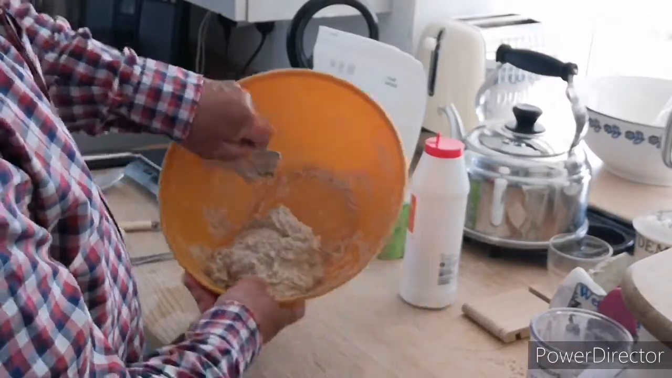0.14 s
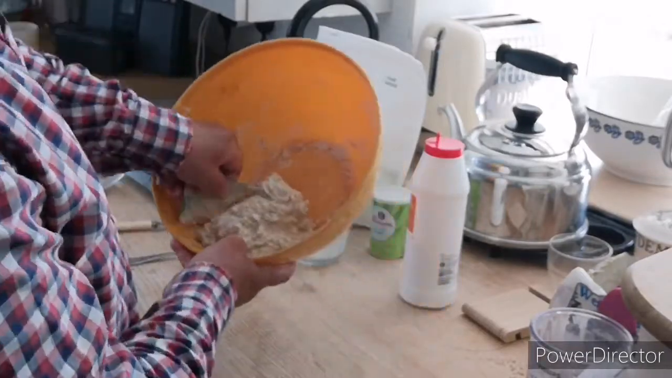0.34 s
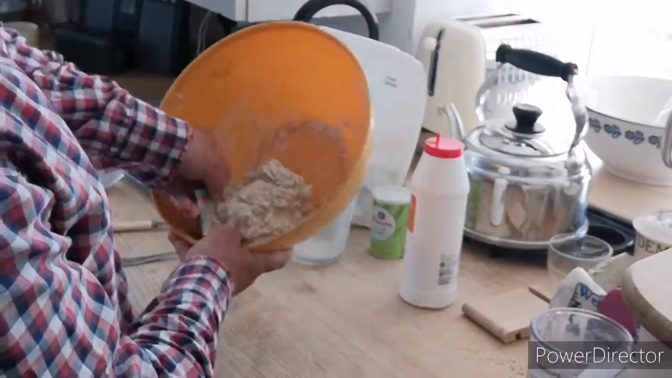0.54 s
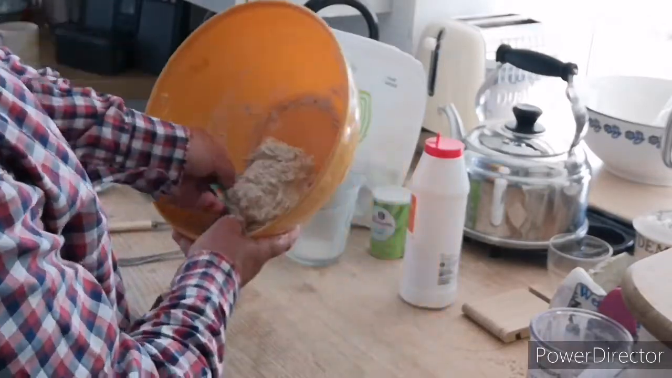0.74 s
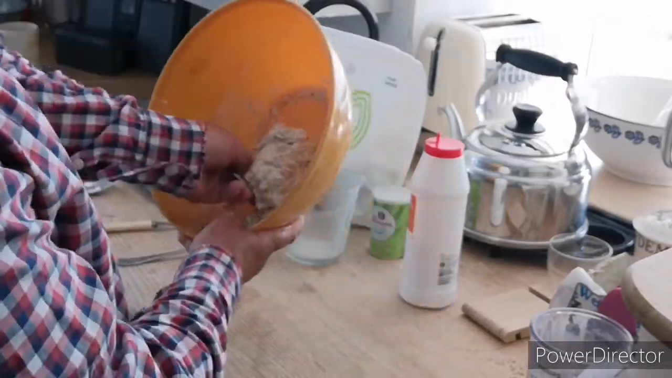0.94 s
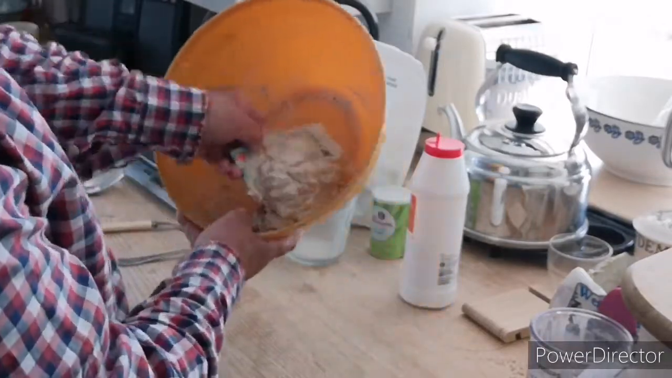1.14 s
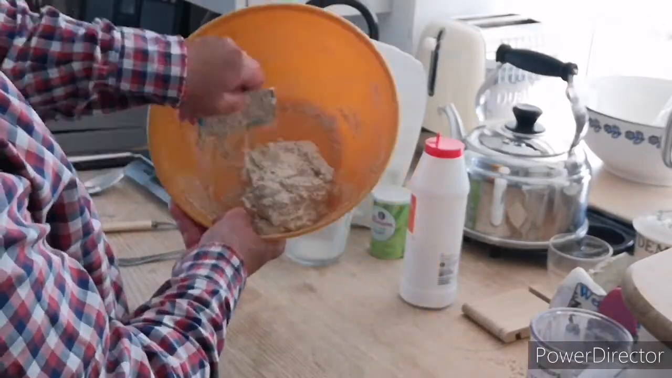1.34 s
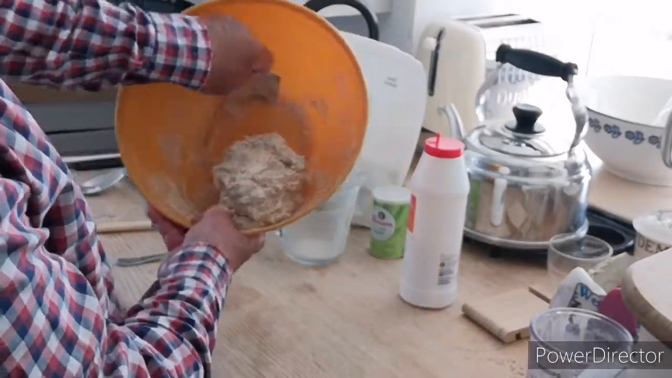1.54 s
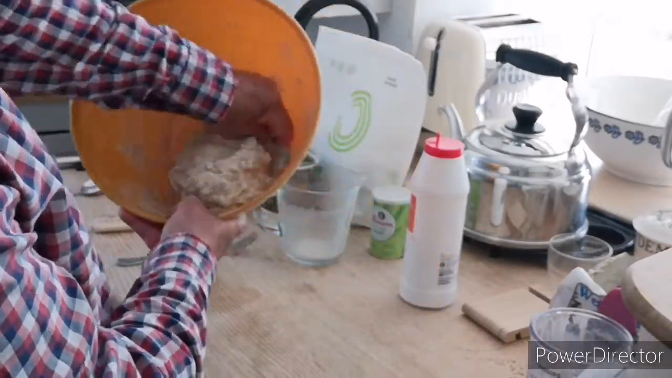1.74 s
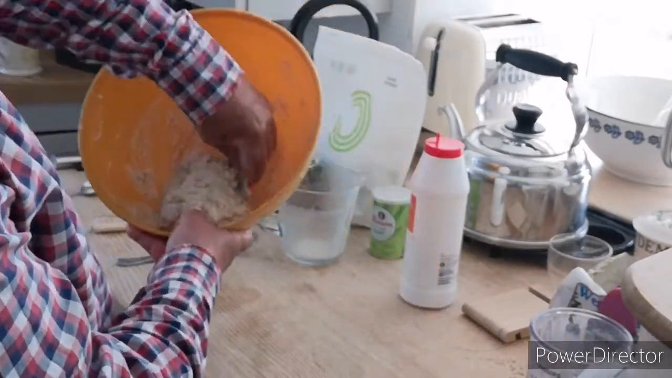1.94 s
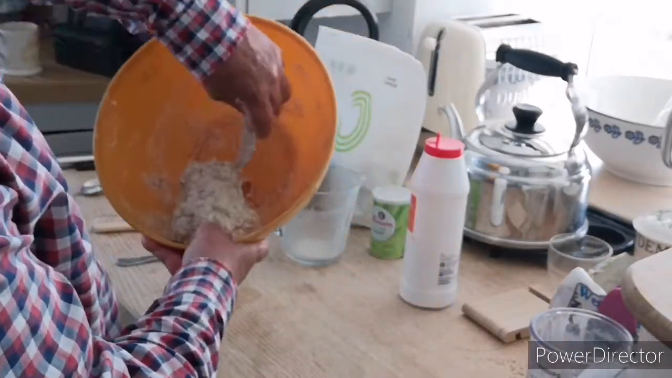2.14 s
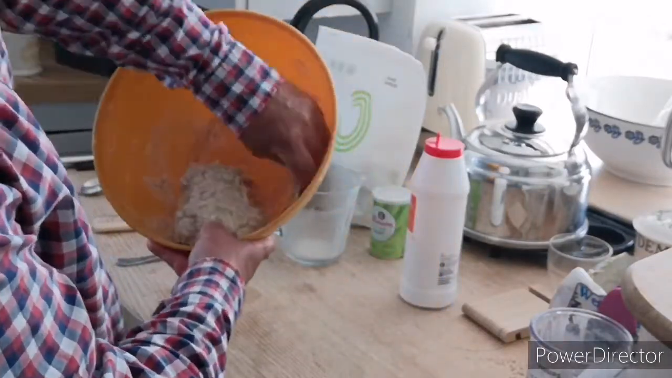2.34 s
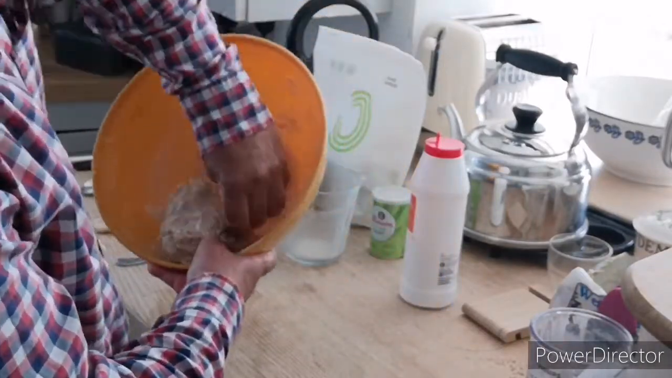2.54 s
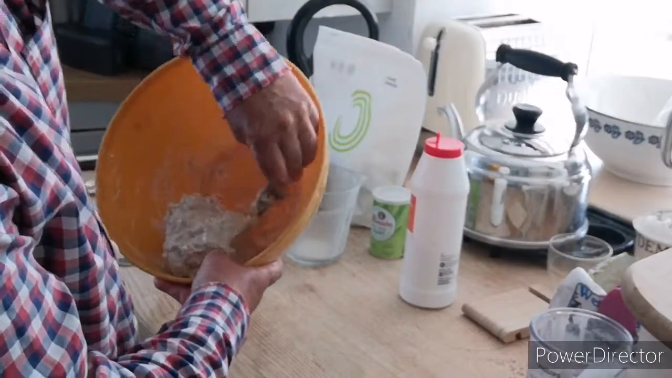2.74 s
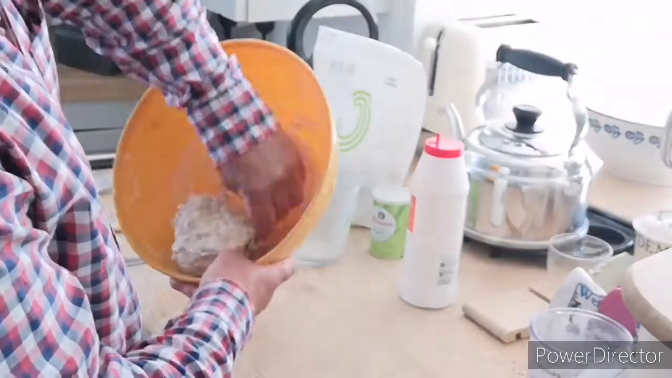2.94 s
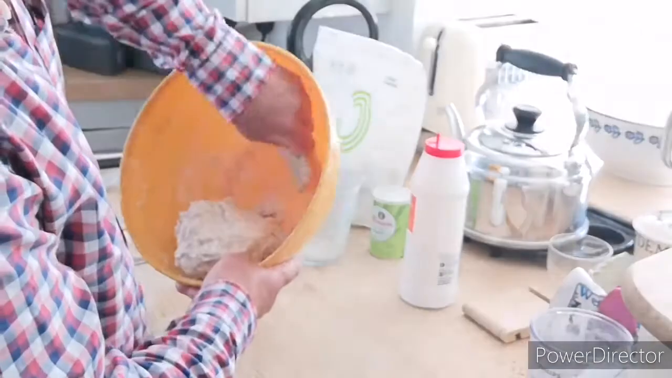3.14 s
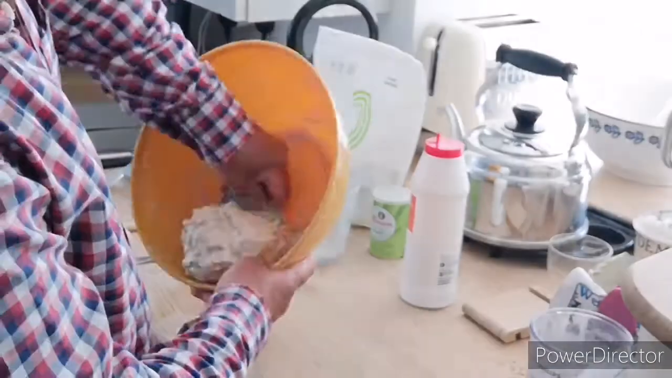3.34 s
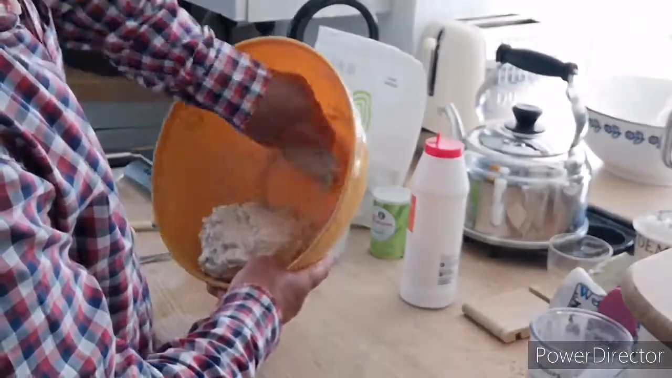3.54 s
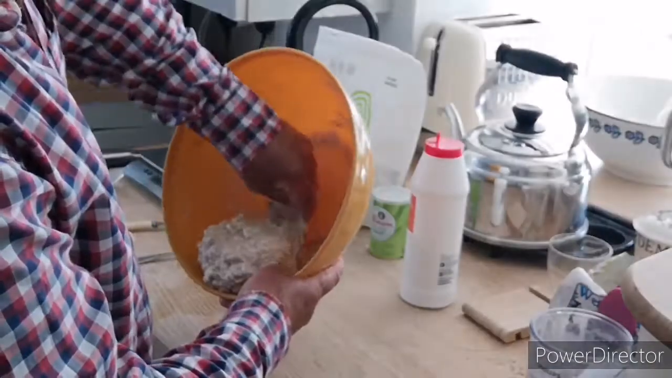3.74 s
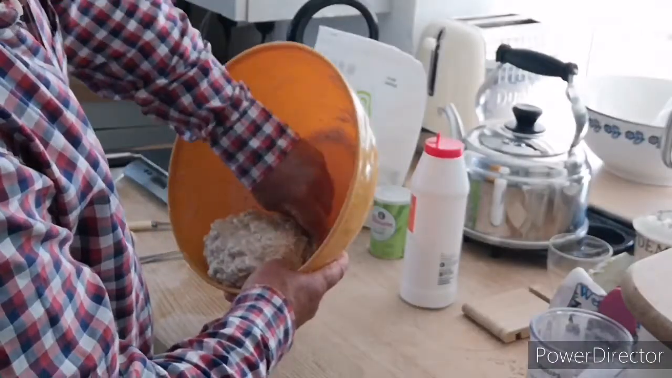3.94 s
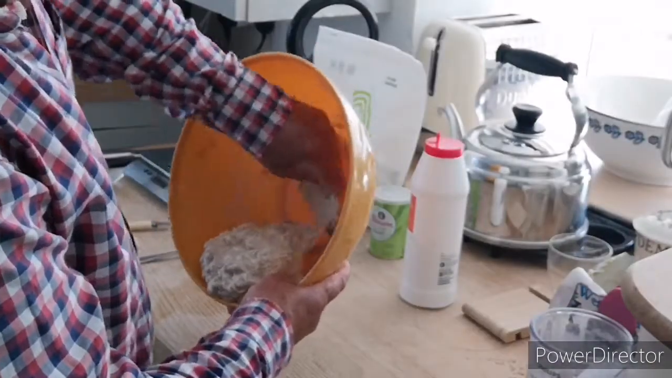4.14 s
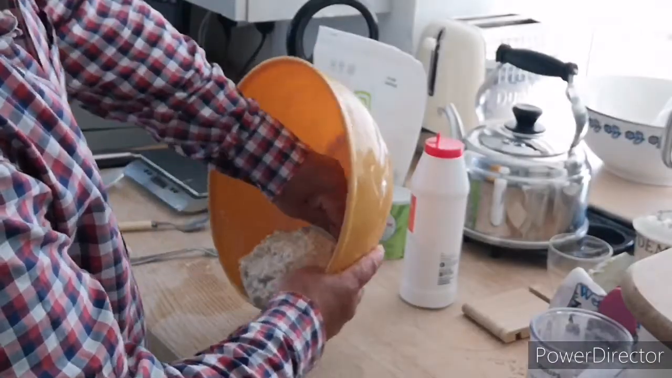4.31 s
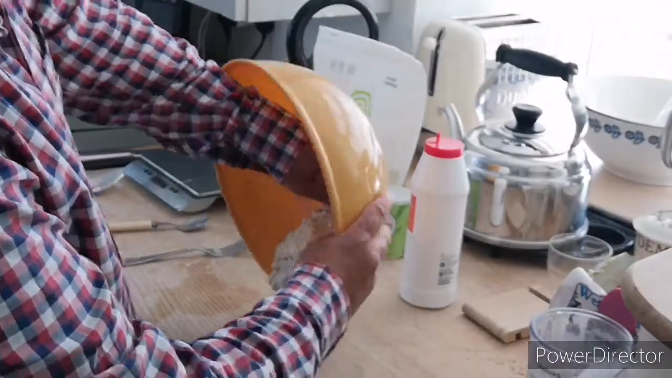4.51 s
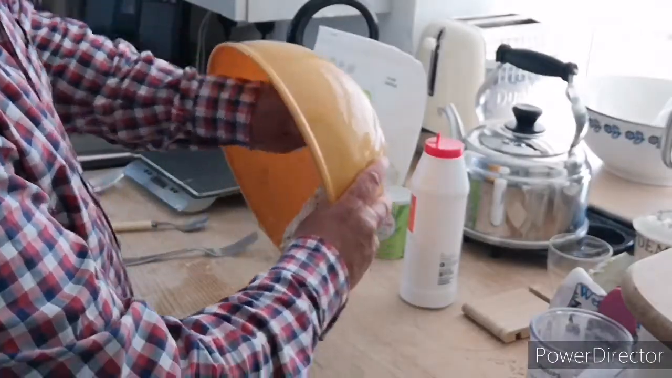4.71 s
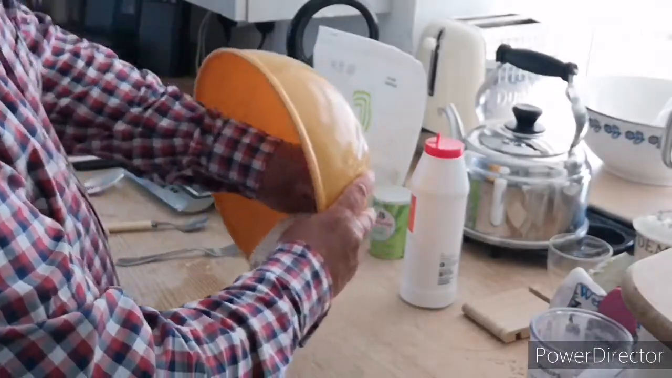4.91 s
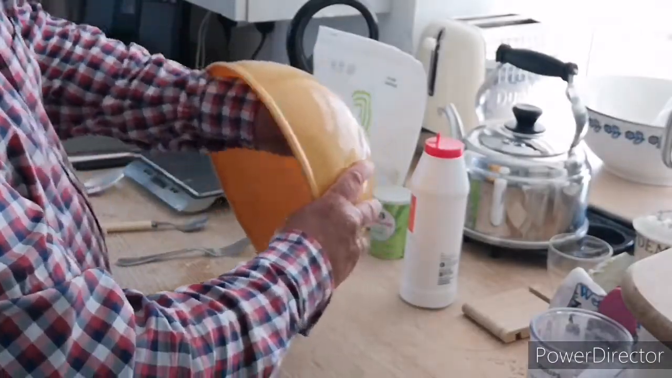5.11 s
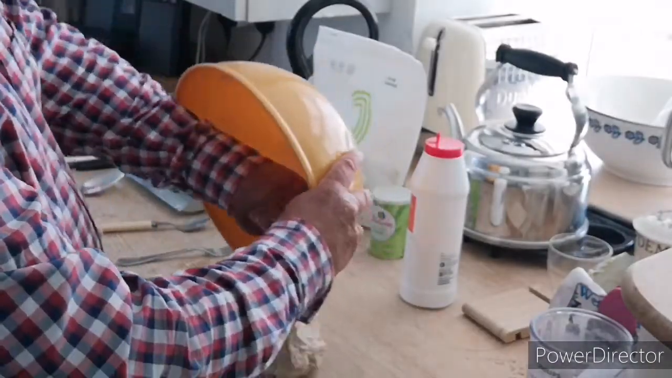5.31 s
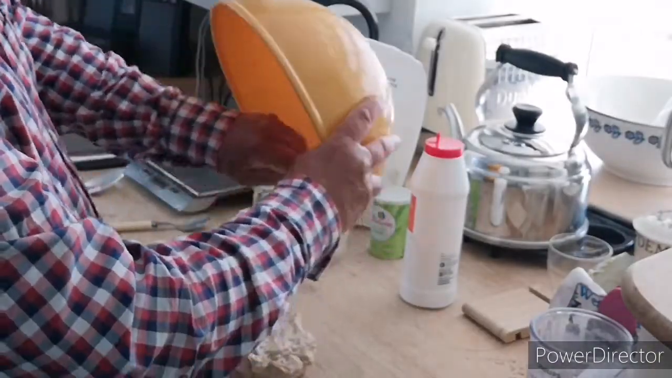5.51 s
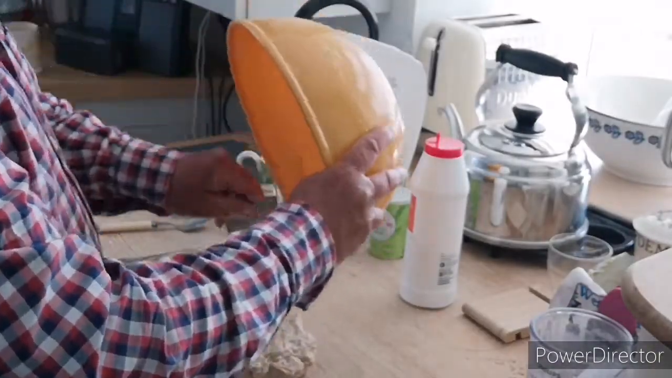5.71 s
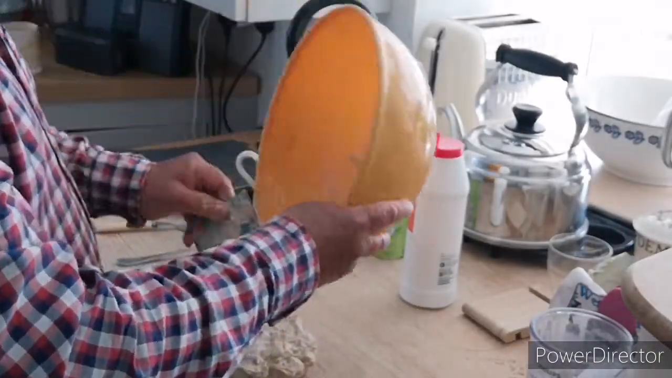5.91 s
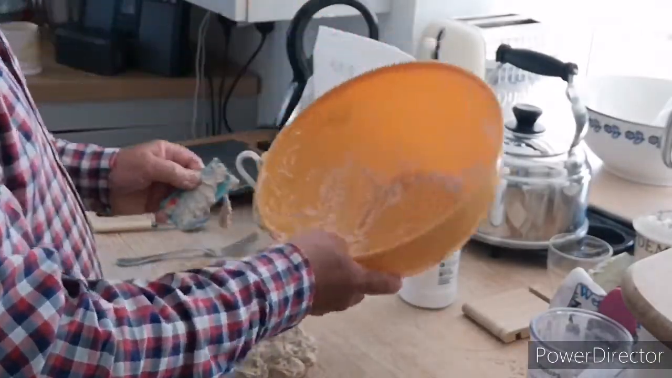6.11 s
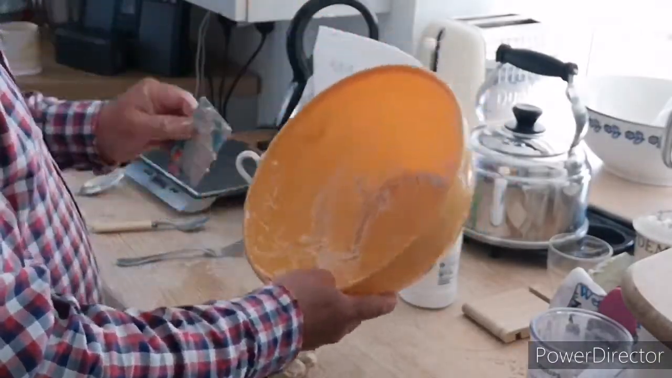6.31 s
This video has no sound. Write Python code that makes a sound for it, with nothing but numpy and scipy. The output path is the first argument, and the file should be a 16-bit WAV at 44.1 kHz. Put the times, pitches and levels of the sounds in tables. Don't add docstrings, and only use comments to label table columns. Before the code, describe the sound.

Close, dry-edged scraping in a small kitchen: each stroke lands with a plastic knock, swells into a grainy rasp and stops abruptly as the blade lifts. The bowl rings mid-high, sometimes hollow, sometimes tight and bright. Strokes are sparse at first and cluster later, finishing with hard knocks and a soft tap. Soft fridge murmur, room air and low thuds lie underneath.

```python
import sys
import numpy as np
from scipy import signal
from scipy.fft import rfft, irfft, next_fast_len
from scipy.io import wavfile
from scipy.ndimage import uniform_filter1d, map_coordinates

SR = 44100
rng = np.random.default_rng(int(sys.argv[2]) if len(sys.argv) > 2 else 0)


def boost_factor(decibels):
    exponent = np.asarray(decibels, float) / 20
    return 10 ** exponent


def wrap_up_sound(samples):
    columns = np.atleast_2d(samples).T
    tamed = np.clip(columns, -1, 1)
    steps = np.round(tamed * 32767).astype(np.int16)
    wavfile.write(sys.argv[1], SR, steps)


N = 284797
T = np.arange(N) / SR

# (time [s], level [dB])
RUMBLE_LEVEL = [(0.0, -55), (0.03, -68), (0.47, -51.5), (0.61, -61), (2.32, -58), (2.39, -71),
                (2.45, -54.5), (3.22, -55.5), (3.79, -47.5), (3.9, -66), (4.06, -51.5), (4.59, -55.5),
                (4.89, -53.5), (5.05, -41.5), (6.08, -63.5), (6.46, -53)]
# (frequency [Hz], density [dB per Hz])
RUMBLE_TONE = [(14, -60), (24, -5.5), (36, -11.5), (43, -2), (49, -8), (55, -13), (66, -16.5), (150, -40.5),
               (320, -29.5), (480, -58.5), (900, -120)]
# (frequency [Hz], width [Hz], level [dB])
HUM_MODES = [(138, 10.1, -2), (164, 9.8, -9)]
# (frequency [Hz], density [dB per Hz])
MURMUR_TONE = [(40, -42), (60, -13), (82, -3.5), (105, -10), (190, -13.5), (260, -50)]
# (time [s], level [dB])
WHINE_LEVEL = [(0, -92), (1.9, -102), (2.0, -74), (2.2, -96), (5.7, -87), (6.46, -97.5)]
# (time [s], level [dB])
THUDS = [
    (.47, -51),
    (1.86, -43.5),
    (2.45, -59),
    (2.59, -50),
    (3.03, -48.5),
    (5.05, -56),
    (5.4, -50),
    (5.65, -57),
]
# (frequency [Hz], density [dB per Hz])
AIR_TONE = [(110, -19.5), (180, -9.5), (287, -2.5), (409, -13), (432, -12.5), (502, -15.5), (676, -23.5),
            (1100, -20), (1270, -26), (1780, -25), (1920, -23), (2190, -24.5), (2950, -29.5), (4790, -33.5),
            (15500, -50.5)]
# (frequency [Hz], likeness [0-1])
ALIKE = [(50, 1), (100, 0.97), (140, 1), (290, 0.57), (600, 0.022), (15000, 0.028)]

# (time [s], hold [s], wall ring [dB], blade hiss [dB re wall], favoured wall pitch [Hz])
DRAGS = [(0.0, 0.059, -51, -12, 2100), (0.1, 0.047, -64, -23, 1500), (0.299, 0.081, -45, -13.5, 2240),
         (0.377, .02, -36.5, -26, 1920), (0.547, 0.042, -58.5, -12, 1950), (0.65, .1, -74, -14, 1600),
         (0.821, 0.004, -45.5, -27, 2030), (1.65, 0.012, -33.5, -17.5, 2000), (1.9, 0.11, -65, -5.5, 1900),
         (2.403, 0.069, -43, -19, 1974), (2.967, 0.023, -36, -14, 1970), (3.21, .09, -56, -25.5, 1930),
         (3.522, 0.09, -69.5, -6, 2000), (3.98, .012, -57, -18, 1680), (3.993, 0.016, -46.5, -14.5, 1680),
         (4.45, 0.05, -67.5, -18, 1810), (4.865, 0.045, -47, -14, 2220), (5.185, 0.086, -61.5, -25, 1830),
         (5.333, 0.017, -40.5, -13.5, 2210), (5.562, 0.028, -37.5, -28, 1690),
         (5.957, 0.043, -56, -32, 2060)]
# (time [s], time to full speed [s], wall ring [dB], blade hiss [dB re wall], favoured wall pitch [Hz])
SWEEPS = [(0.36, 0.062, -41, -12.5, 2170), (1.68, 0.075, -39.5, -9, 1950), (1.72, 0.085, -42.5, -5, 1950),
          (2.44, 0.11, -51, -8.5, 2230), (2.99, .04, -51.5, -13.5, 1950), (3.215, 0.061, -47, -31, 1900),
          (3.255, 0.076, -47, 2, 2300), (3.32, 0.061, -40.5, -11, 1950), (3.652, 0.057, -46.5, -2.5, 1760),
          (3.69, 0.048, -40.5, -5, 2400), (3.995, 0.06, -44.5, -2.5, 1890), (4.282, 0.027, -50, -4.5, 2460),
          (4.3, 0.043, -41.5, -10.5, 2360), (4.885, 0.047, -35, -16, 2280), (5.266, 0.029, -41, -16, 2240),
          (5.33, 0.04, -45.5, -19, 2360), (5.58, 0.03, -46.5, -19, 2030)]
# (time [s], hollow [dB re wall], hollow pitch [Hz], free rim [dB re wall], left-right lean [dB])
POSE = [(0, 0.5, 605, -15, 0.5), (.2, -12.5, 1150, -12, 1), (.29, -46, 1070, -17.5, -1.5),
        (.45, -17.5, 1140, -16.5, -1), (.7, 0, 824, -20, -1.5), (.83, -5, 523, -9.5, 0),
        (1.75, -9.5, 817, -34, -.6), (1.95, -1, 800, -12, 1.5), (2.4, -23.5, 1150, -35, -2),
        (2.97, -9.5, 860, -32, -1), (3.25, -5, 600, -28, -.5), (3.75, -18, 650, -25, -.5),
        (4.03, 0, 524, -36, -.5), (4.36, -17, 636, -15, -.5), (4.5, 2.5, 680, -19, -1),
        (4.88, -31, 1240, -27, -0.5), (5.5, -15, 1170, -29, -0.5), (5.96, -6, 530, -32, -1)]
# (frequency [Hz], width [Hz], level [dB])
WALL = [(1234, 105, -10), (1662, 250, -1), (1902, 178, 4), (2130, 300, 0.5), (2563, 130, 0.5),
        (2690, 110, 1), (2976, 350, -6)]
# (frequency [Hz], width [Hz], level [dB])
HOLLOW = [(397, 200, -18), (495, 100, -5.5), (567, 47, -1.5), (745, 88, -5.5), (840, 135, -6),
          (972, 150, -1), (1280, 260, -3)]
# (frequency [Hz], width [Hz], level [dB])
UPPER = [(3160, 590, -5), (3784, 490, -0.5), (4150, 370, -1.5), (4790, 530, -1.5), (5140, 585, -1.5),
         (5755, 720, -2.5), (6226, 920, -10)]
# (frequency [Hz], width [Hz], level [dB])
RIM = [(2880, 270, -8.5), (4560, 94, 6), (5200, 1050, -4)]
WALL_PLACES_HZ = [1500, 1950, 2400, 3050]
HOLLOW_PLACES_HZ = [530, 800, 1150]
# (frequency [Hz], density [dB per Hz])
BLADE = [(3240, -1), (5500, -37.5), (6430, 0.5), (7680, 0), (8860, -3), (12000, -18), (14400, -29),
         (15500, -38)]
# (frequency [Hz], density [dB per Hz])
EDGE = [(7000, -60), (9500, -6), (12000, -3.5), (14400, 0.5), (15500, -34)]

# (time [s], peak [dB], hollow [dB re peak], crack [dB re peak], struck wall pitch [Hz])
KNOCKS = [(0.3009, -36.5, -12, -3, 1740), (0.3564, -23, -26, -22, 2300), (0.378, -26.5, -31, -18, 1990),
          (0.82, -30.5, -29, -7, 2880), (1.6496, -15.5, 3, 5, 2140), (1.6724, -31, -17, -15, 2700),
          (2.4053, -36, -23, -38, 1990), (2.9677, -20.5, -6, -33, 1940), (3.2092, -43, 5, -8, 1620),
          (3.5244, -51.5, -43, 3, 1900), (3.9937, -31, -15, -15, 1630), (4.129, -33, -10, -15, 1650),
          (4.2947, -37, -21, -18, 2940), (4.863, -37.5, -28, -20, 1690), (4.9038, -20, -57, -13.5, 2130),
          (4.9353, -20.5, -43, -22, 1840), (5.2735, -32, -31, -25, 1770), (5.2947, -25, -37, -18, 1790),
          (5.3349, -20, -42, -21, 1940), (5.565, -18.5, -30, -33, 1715), (5.9599, -40, -19.5, -29, 2240)]
# (time [s], peak [dB], centre [Hz], fizz t60 [s])
TICKS = [
    (1.2491, -54, 11400, 0.23),
    (1.3927, -59, 8120, 0.08),
    (2.2657, -57, 8070, 0.089),
    (2.702, -50.5, 9600, 0.28),
    (2.8784, -58, 7660, 0.08),
    (3.1492, -50.5, 8200, 0.19),
    (3.526, -44, 6660, 0.078),
    (3.92, -43.5, 8950, 0.1),
    (4.58, -51.5, 8800, 0.17),
    (5.1168, -51, 6800, 0.08),
]
# (time [s], length [s], pitch [Hz], level [dB])
SQUEAKS = [
    (2.897, 0.066, 5900, -77),
    (4.184, 0.097, 5660, -67.5),
]
# (frequency [Hz], t60 [s])
KITCHEN = [(300, 0.39), (2000, 0.29), (6000, 0.27), (14000, 0.19)]

HUM_DB, THUD_S, AIR_DB = -58, 0.036, -64.5
SWEEP_RISE_DB, SWEEP_ROUND_S = 19.5, 0.039
DRAG_SAG_DB_PER_S, DRAG_ROUND_S = 37, 0.0037
LIFT_DB_PER_S, BLADE_LIFT_DB_PER_S = 292, 67
TRAIL_DB, TRAIL_DB_PER_S, HOLLOW_TRAIL_DB = -30.5, 107, 2
UPPER_DB, UPPER_FOLLOWS = -0.5, 0.65
EDGE_DB, EDGE_FOLLOWS = -12.5, 1.54
SQUEAK_RISE_S, SQUEAK_SAG_DB_PER_S = 0.011, 124
TOP_HZ = 15500


def unit(x):
    return x / np.sqrt(np.mean(x ** 2) + 1e-20)


def along(points, hz):
    f, v = np.transpose(points)
    return np.interp(np.log(hz + 1), np.log(f + 1), v)


def curves(rows):
    s, *cols = np.transpose(rows)
    return [np.interp(T, s, c) for c in cols]


def wobble(rate):
    knots = rng.standard_normal(int(N * rate / SR) + 4)
    return map_coordinates(knots, [T * rate])


def filtered(x, response):
    m = next_fast_len(N + SR // 2)
    return irfft(rfft(x, m) * response(np.fft.rfftfreq(m, 1 / SR)), m)[..., :N]


def modes(peaks):
    def response(f):
        total = 0
        for k, (centre, width, db) in enumerate(peaks):
            damping = 1j * f * width
            total = total + (-1) ** k * boost_factor(db) * damping / (centre * centre - f * f + damping)
        return total
    return response


def colour(spectrum):
    return lambda f: boost_factor(along(spectrum, f))


def patchy(x, depth_db, bins, frames):
    z = signal.stft(x, nperseg=512)[2]
    field = uniform_filter1d(rng.standard_normal(z.shape[1:]), size=bins, axis=0)
    field = uniform_filter1d(field, size=frames, axis=1)
    return unit(signal.istft(z * boost_factor(depth_db * unit(field)), nperseg=512)[1][:, :N])


def stereo_noise(response, patchy_db):
    pair = patchy(rng.standard_normal((2, N)), patchy_db, bins=6, frames=14)

    def mid_side(hz):
        turn = np.arccos(np.clip(along(ALIKE, hz), -1, 1)) / 2
        return response(hz) * [np.cos(turn), np.sin(turn)]
    mid, side = filtered(pair, mid_side)
    return np.array([mid + side, mid - side]) / np.sqrt(np.mean(mid ** 2))


def background():
    swell = boost_factor(HUM_DB) + sum(boost_factor(db) * np.exp(-((T - s) / THUD_S) ** 2) for s, db in THUDS)
    rumble = boost_factor(curves(RUMBLE_LEVEL)[0] + 2.0) * stereo_noise(colour(RUMBLE_TONE), patchy_db=1.5)
    hum = swell * stereo_noise(lambda f: modes(HUM_MODES)(f) ** 2, patchy_db=1.5)
    murmur = boost_factor(-63) * stereo_noise(colour(MURMUR_TONE), patchy_db=-3.9)
    fan = lambda f: modes([(4750, 300, 0)])(f) ** 2
    whine = boost_factor(curves(WHINE_LEVEL)[0]) * stereo_noise(fan, patchy_db=2)
    air = boost_factor(AIR_DB) * stereo_noise(colour(AIR_TONE), patchy_db=0.16)
    return rumble + hum + murmur + whine + air


def strokes():
    wall, upper, blade, pitch, trail, edge = np.full((6, N), 1e-9)
    for rows, round_s, sweeps in ((DRAGS, DRAG_ROUND_S, False), (SWEEPS, SWEEP_ROUND_S, True)):
        for s, length, db, hiss_db, hz in rows:
            at = slice(round(s * SR), round(s * SR) + SR // 2)
            t = T[at] - s
            if sweeps:
                early_db = -SWEEP_RISE_DB * np.clip(1 - t / length, 0, 1) ** 2
            else:
                early_db = -DRAG_SAG_DB_PER_S * np.minimum(t, length)
            late = np.hypot(np.clip(t - length, 0, 1), round_s) - round_s
            touch = np.clip(t * 700, 0, 1)
            power = touch ** 2 * boost_factor(db + early_db - LIFT_DB_PER_S * late) ** 2
            trail[at] += (t > length) * boost_factor(db + TRAIL_DB - TRAIL_DB_PER_S * late) ** 2
            hiss_db = hiss_db - BLADE_LIFT_DB_PER_S * late
            wall[at] += power
            upper[at] += power * boost_factor(UPPER_DB + UPPER_FOLLOWS * hiss_db) ** 2
            blade[at] += power * boost_factor(hiss_db) ** 2
            edge[at] += power * boost_factor(EDGE_DB + EDGE_FOLLOWS * hiss_db) ** 2
            pitch[at] += power * hz
    live = wall > 1e-9
    return *(live * np.sqrt([trail, wall, upper, blade, edge])), pitch / wall


def slips(rate, spread_db, clump_db, shared):
    when, size, sign = rng.random((3, 3, N))
    grains = (when < rate / SR) * boost_factor(-spread_db * np.log(size + 1e-4)) * np.sign(sign - .5)
    common, own = grains[0], grains[1:]
    mixed = np.sqrt(shared) * common + np.sqrt(1 - shared) * own
    return unit(mixed * boost_factor(clump_db * wobble(60)))


def rung_at(grains, body, places, place_hz, focus):
    out, nearest = 0, np.interp(place_hz, places, np.arange(len(places)))
    for k, hz in enumerate(places):
        favoured = lambda f: modes(body)(f) * modes([(hz, focus * hz, 0)])(f)
        share = np.sqrt(np.clip(1 - abs(nearest - k), 0, 1))
        out = out + share * unit(filtered(grains, favoured))
    return out


def scraping():
    trail, wall, upper, blade, edge, wall_hz = strokes()
    hollow_db, hollow_hz, rim_db, _ = curves(POSE)
    grains = slips(rate=7000, spread_db=2.5, clump_db=1.0, shared=0.14)
    fine = slips(rate=20000, spread_db=0.0, clump_db=1.0, shared=0.25)
    fine = patchy(fine, 2.65, bins=4, frames=6)
    grains = patchy(grains, 3.93, bins=2, frames=10)
    wall_ring = rung_at(grains, WALL, WALL_PLACES_HZ, wall_hz, focus=0.4)
    hollow_ring = rung_at(grains, HOLLOW, HOLLOW_PLACES_HZ, hollow_hz, focus=0.33)
    sound = (wall + trail) * wall_ring
    sound += (wall + trail * boost_factor(HOLLOW_TRAIL_DB)) * boost_factor(hollow_db - 0.5) * hollow_ring
    sound += (upper + trail * boost_factor(-7)) * boost_factor(2.0) * unit(filtered(grains, modes(UPPER)))
    sound += wall * boost_factor(rim_db) * unit(filtered(grains, modes(RIM)))
    sound += edge * unit(filtered(fine, colour(EDGE)))
    sound += (blade + trail * boost_factor(-16.5)) * boost_factor(3.5) * unit(filtered(fine, colour(BLADE)))
    return sound


def knocks():
    (wall, hollow, crack), t = np.zeros((3, 2, N)), np.arange(1500) / SR
    for s, db, hollow_db, crack_db, hz in KNOCKS:
        rattle = 0.12 * rng.standard_normal((2, len(t))) * boost_factor(-60 * t / 0.019)
        rattle[:, 0] = 1
        spot = np.sin(2 * np.pi * hz * t) + 0.14 * np.sin(2 * np.pi * 1.363 * hz * t)
        ring = (1 - np.exp(-t / 0.00022)) ** 2 * boost_factor(-60 * t / 0.012) * spot
        start = round((s + 0.000936) * SR)
        at = slice(start, start + len(t))
        wall[:, at] += boost_factor(db - 3.5) * signal.fftconvolve(rattle, ring[None], axes=1)[:, :len(t)]
        hollow[:, at] += boost_factor(db + hollow_db + 23.0) * rattle
        crack[:, at] += boost_factor(db + crack_db + 11) * rattle * boost_factor(-60 * t / 0.08)
    bright = modes([(4680, 1120, 3.5), (5630, 1300, 4.0), (9050, 4100, -16)])
    air = modes([(740, 130, 0), (840, 130, -3), (1050, 200, -8)])
    boom = lambda f: air(f) * modes([(770, 400, 0)])(f)
    return wall + filtered(hollow, boom) + filtered(crack, bright)


def dough():
    out, t = np.zeros((2, N + SR)), np.arange(SR // 8) / SR
    for s, db, hz, t60 in TICKS:
        limits = [0.64 * hz, min(1.23 * hz, 15000)]
        band = signal.butter(1, limits, "bandpass", fs=SR, output="sos")
        fizz = unit(signal.sosfilt(np.vstack([band, band]), rng.standard_normal((2, len(t)))))
        decay = boost_factor(-60 * t / 0.0052) + 0.54 * boost_factor(-60 * t / t60)
        out[:, round(s * SR):][:, :len(t)] += boost_factor(db - 11) * fizz * decay
    return out[:, :N]


def squeaks():
    flutter, out = np.cumsum(.027 * wobble(500)) / SR, 0
    for s, length, hz, db in SQUEAKS:
        t = np.clip(T - s, 0, 1)
        gate = np.clip(t / SQUEAK_RISE_S, 0, 1) * np.clip((length - t) / 0.019, 0, 1)
        gate = gate * boost_factor(db - SQUEAK_SAG_DB_PER_S * t)
        ear_phase = np.array([[0], [1.3]])
        out = out + gate * np.sin(2 * np.pi * hz * (t + flutter) + ear_phase)
    return boost_factor(10 + 2.4 * wobble(110)) * out


def kitchen(x):
    hop, out = SR // 5, np.zeros((2, N + 2 * SR))
    padded = np.pad(x, ((0, 0), (hop, 2 * hop)))
    fade = np.sin(np.pi * np.arange(2 * hop) / (2 * hop))
    for start in range(-hop, N, hop):
        hz, t, z = signal.stft(rng.standard_normal((2, SR // 2)), SR, nperseg=128)
        decay = boost_factor(-60 * t / along(KITCHEN, hz)[:, None])
        tail = signal.istft(z * decay, SR, nperseg=128)[1]
        piece = padded[:, start + hop:start + 3 * hop] * fade
        wet = signal.fftconvolve(piece, tail / np.linalg.norm(tail[0]), axes=1)
        out[:, start + hop:][:, :wet.shape[1]] += wet
    return x + boost_factor(-8.5) * out[:, hop - 300:hop - 300 + N]


def scene():
    pan_db = curves(POSE)[3]
    bowl = kitchen(scraping() + knocks() + dough() + squeaks())
    return bowl * boost_factor(np.array([pan_db, -pan_db]) / 2) + background()


def low_pass(x):
    return signal.sosfilt(signal.butter(12, 15680, fs=SR, output="sos"), x)


def record(dry):
    heard = filtered(dry, lambda hz: hz < TOP_HZ)
    return low_pass(heard)


dry = scene()
out = record(dry)
wrap_up_sound(out)
```